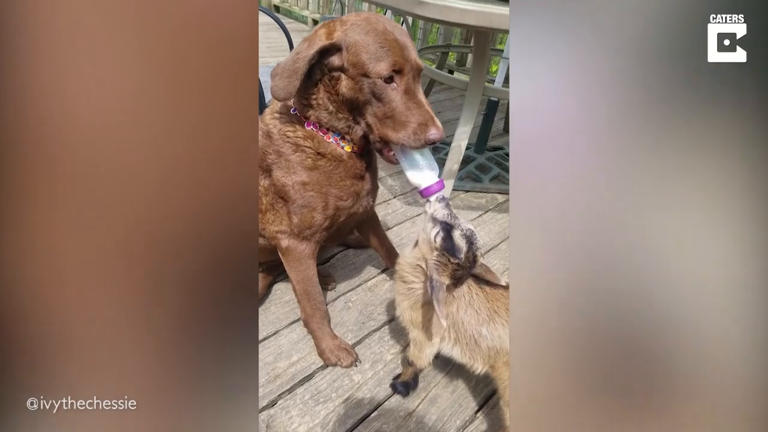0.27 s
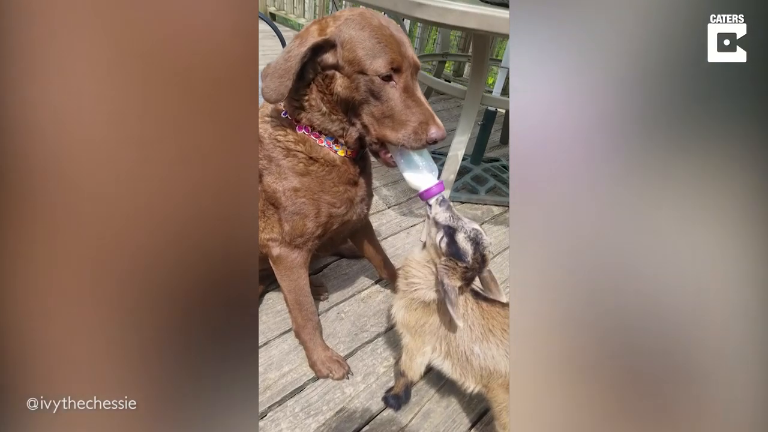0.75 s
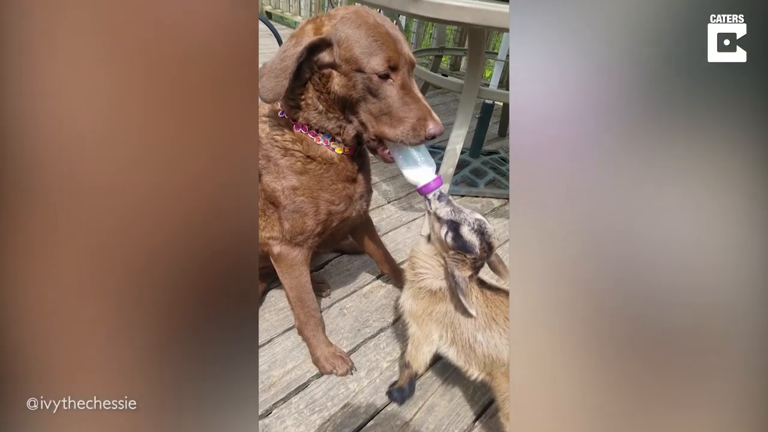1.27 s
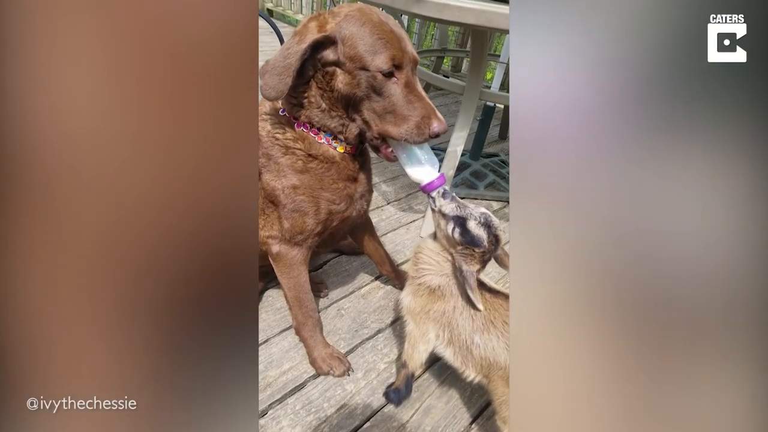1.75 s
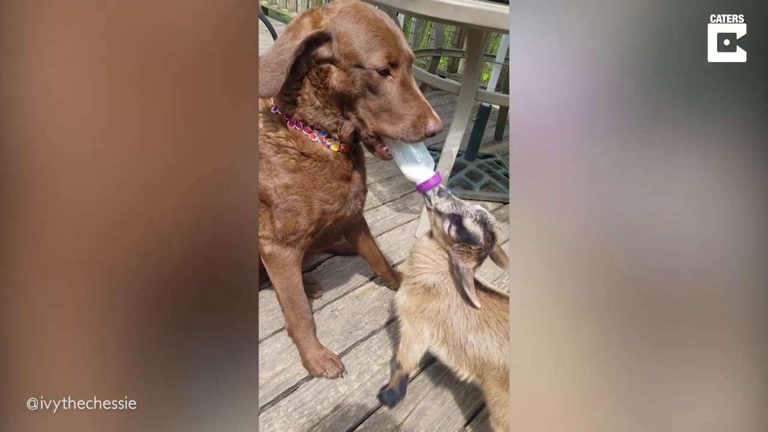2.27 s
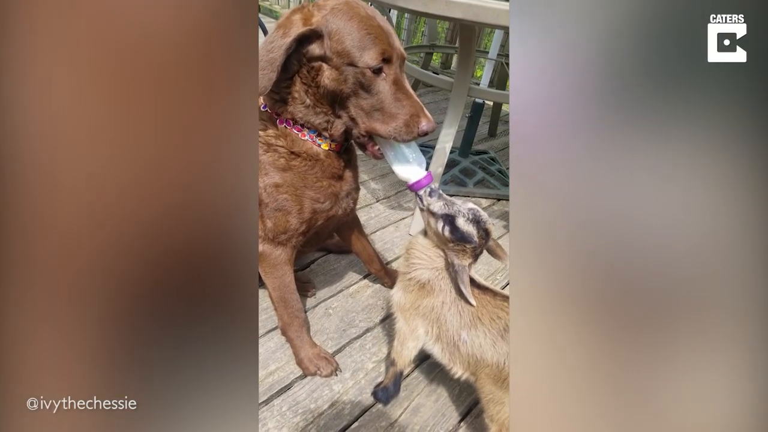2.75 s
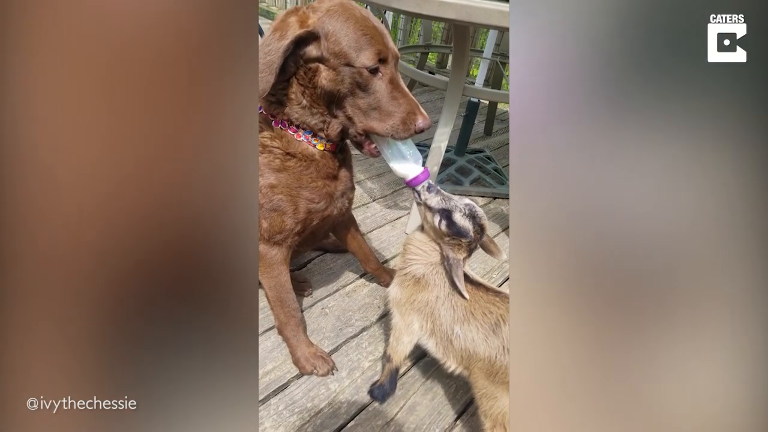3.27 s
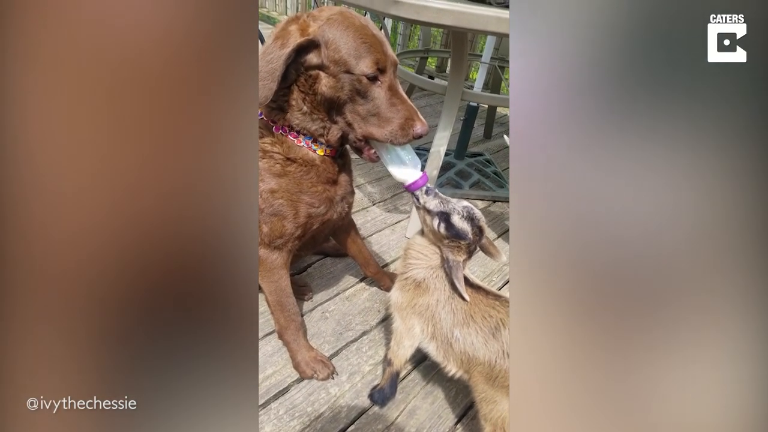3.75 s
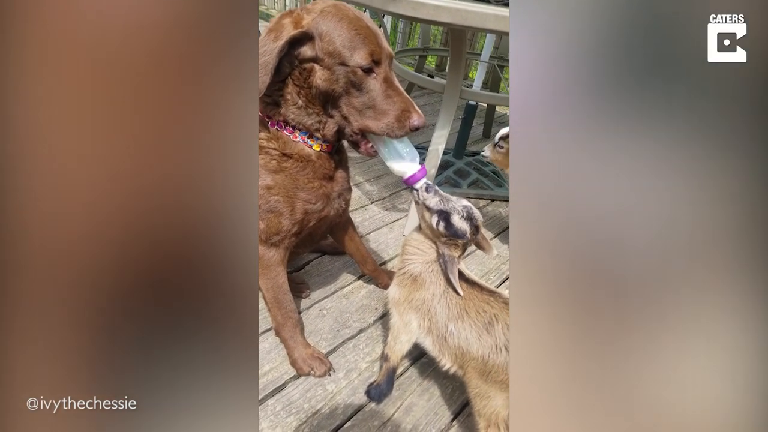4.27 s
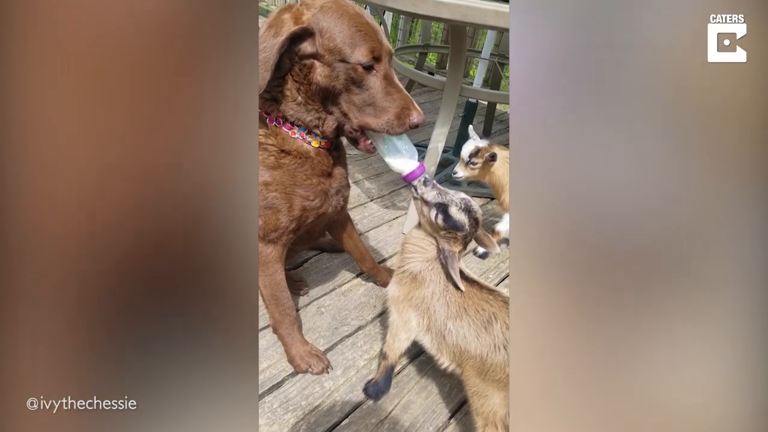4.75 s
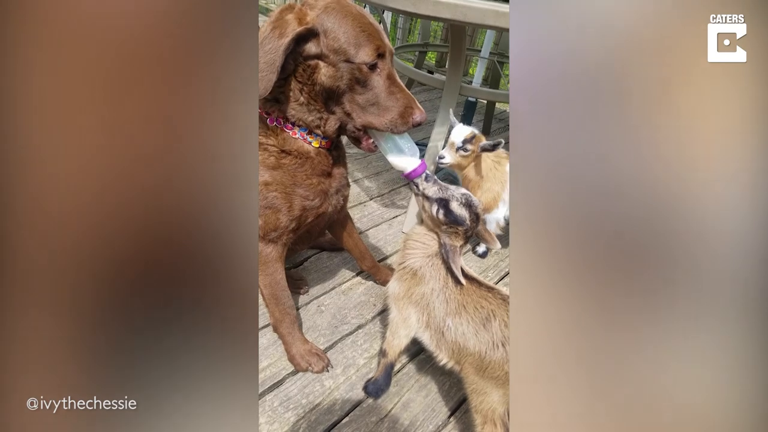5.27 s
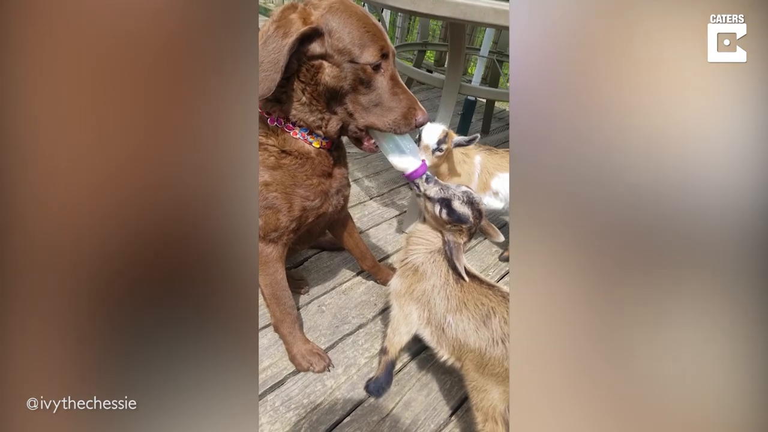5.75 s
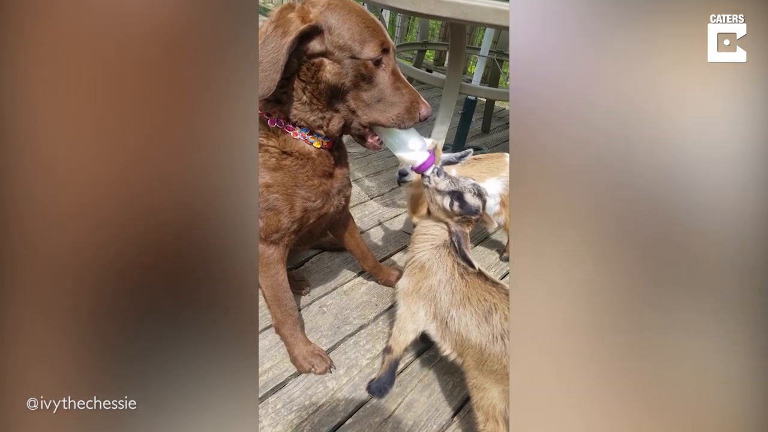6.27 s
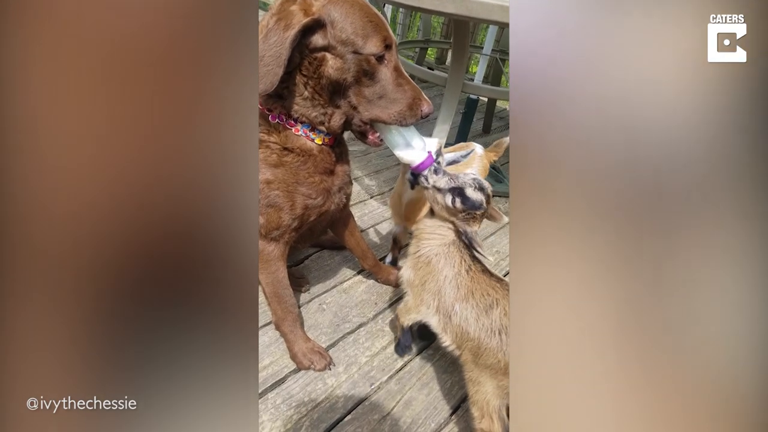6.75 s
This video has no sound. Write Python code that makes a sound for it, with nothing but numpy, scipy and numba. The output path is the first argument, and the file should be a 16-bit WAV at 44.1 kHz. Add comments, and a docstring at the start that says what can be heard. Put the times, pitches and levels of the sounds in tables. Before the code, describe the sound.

Close, soft suckling of a baby goat on a bottle: fizzy slurps, wet snaps and small swallows over faint outdoor rumble.

```python
"""A goat kid sucks at a milk bottle that a dog holds on a wooden deck, close to a phone.
In each suck the lips part and close again: tiny bursts of milk and air ring the gap, which mostly
falls in pitch as it opens and climbs as it shuts. Squelches, wet snaps, hollow plops, teat rubs,
soft shuffling, thin hisses and ticking foam fill in around the sucks, all scattered by the boards.
Puffs of wind hit the microphone over outdoor air and the hum of a distant machine."""
import sys
import numpy as np
from scipy import signal
from scipy.fft import rfft, irfft, next_fast_len
from scipy.io import wavfile
from numba import njit

SR = 44100
rng = np.random.default_rng(int(sys.argv[2]) if len(sys.argv) > 2 else 0)


def digitize_waveform(pressure):
    """Quantize a signal to 16-bit integers and store it at the path in sys.argv[1].

    Rows of a 2-D input are taken as channels; values are limited to [-1, 1].
    """
    field = np.atleast_2d(pressure).T
    bounded = np.clip(field, -1, 1)
    quanta = np.round(bounded * 32767).astype(np.int16)
    wavfile.write(sys.argv[1], SR, quanta)


N = 309141

# Cue levels are set ahead of each layer's trim and the deck.
# full sucks: t/s, parting length/s, closing length/s, parting level/dB, closing level/dB, widest gap f/Hz
SUCK_CUES = [(0.864, .057, 0.041, -66.5, -55, 6540), (1.084, .051, 0.034, -64, -50, 4600),
             (1.313, 0.061, 0.047, -64, -50, 4080), (3.282, 0.039, 0.065, -58.5, -55, 4640),
             (3.494, 0.051, 0.04, -56.5, -49.5, 3820), (3.749, 0.048, 0.043, -54, -43.5, 3820),
             (4.29, .045, 0.016, -59, -47.5, 3900), (4.542, 0.032, 0.049, -63.5, -53, 6360),
             (5.005, 0.07, 0.055, -66, -50.5, 6250), (5.759, .064, .02, -60, -48.5, 5570),
             (6.295, .092, 0.014, -65, -46, 6840)]
# squelches with the lips held still: t/s, length/s, level/dB, gap f/Hz
SQUELCH_CUES = [(0.375, 0.072, -51, 6840), (0.641, 0.046, -55.5, 5150), (0.712, .033, -62.5, 4350),
                (1.177, 0.056, -65.5, 6400), (1.428, 0.03, -64.5, 6300), (1.556, 0.059, -66.5, 6000),
                (1.634, 0.063, -62.5, 5760), (1.799, 0.036, -55.5, 4740), (1.891, 0.063, -66, 6160),
                (2.032, 0.047, -59.5, 5600), (2.128, 0.097, -65.5, 6460), (2.298, 0.036, -56, 6470),
                (2.365, 0.072, -55, 6280), (2.573, 0.028, -61, 6000), (2.851, 0.0083, -56.5, 6600),
                (3.061, 0.083, -57.5, 5250), (3.596, 0.041, -67.5, 6440), (4.781, 0.088, -63.5, 6070),
                (4.834, 0.029, -56, 6600), (4.878, 0.026, -58.5, 7240), (5.249, 0.03, -65.5, 6130),
                (5.325, 0.051, -57, 5800), (5.491, 0.038, -58.5, 5780), (5.581, 0.061, -52.5, 6250),
                (6.559, 0.072, -57.5, 6220), (6.802, 0.042, -58.5, 6260), (6.872, 0.052, -54, 7030)]
# a wet seal snaps open: t/s, peak level/dB, ring f/Hz
SNAP_CUES = [(0.289, -32.5, 12700), (.957, -35, 12000), (1.091, -31.5, 7550), (1.222, -33, 12300),
             (1.458, -35.5, 6700), (1.858, -27.5, 3360), (2.103, -41, 1700), (2.136, -44, 10500),
             (2.844, -30, 7500), (3.563, -27, 2700), (3.582, -36, 5940), (3.834, -21, 10900),
             (4.343, -28, 8500), (4.605, -36.5, 5570), (5.323, -28.5, 4270), (5.634, -33.5, 7000),
             (5.842, -26, 7600), (6.03, -43, 10600), (6.386, -21, 11800), (6.392, -11, 12600),
             (6.397, -17.5, 11500), (6.881, -26, 7300)]
# hollow plops of swallowed milk and air: t/s, main mode level/dB, f/Hz
PLOP_CUES = [(.664, -37.5, 733), (.671, -38, 688), (1.8595, -51, 577), (2.322, -55, 447), (2.344, -47, 382),
             (2.755, -51.5, 640), (2.785, -53, 348), (3.391, -45.5, 366), (3.561, -44.5, 597),
             (4.907, -42, 785), (5.027, -46.5, 347.5), (5.324, -48, 508), (5.505, -47.5, 560),
             (6.241, -50, 352), (6.689, -47, 579)]
# the teat rubs in the mouth: t/s, length/s, level/dB
RUB_CUES = [(0.381, 0.066, -56.5), (0.639, 0.059, -63), (1.639, 0.023, -61), (1.854, 0.028, -58),
            (2.297, 0.044, -65), (3.329, 0.062, -61.5), (3.586, 0.045, -59.5), (3.816, 0.036, -57.5),
            (4.299, .09, -64.5), (4.598, .05, -63.5), (4.783, 0.067, -65), (6.32, 0.12, -66.5),
            (6.571, 0.057, -64.5)]
# soft shuffling: t/s, length/s, level/dB, hollow f/Hz
SHUFFLE_CUES = [(1.703, 0.085, -67.5, 623), (2.567, 0.055, -68.5, 860), (2.747, 0.069, -68, 376),
                (2.961, 0.35, -78, 780), (3.337, .18, -61.5, 325), (3.605, 0.081, -64.5, 346),
                (4.913, .042, -60.5, 784), (4.994, 0.066, -64.5, 330), (5.128, 0.067, -67.5, 320),
                (5.482, 0.068, -68.5, 573), (5.984, 0.2, -71, 670), (6.232, 0.067, -59, 359),
                (6.306, .124, -71, 712), (6.494, 0.12, -65.5, 410), (6.58, 0.082, -60.5, 545),
                (6.701, .13, -70.5, 565)]
# thin faint hisses: t/s, length/s, level/dB, start f/Hz, end f/Hz
HISS_CUES = [(0.087, .275, -64.5, 3620, 2650), (0.741, 0.086, -72.5, 2777, 2581)]
# wind puffs: t/s, length/s, left level/dB, right level/dB
PUFF_CUES = [(0.0, 0.072, -34, -28.5), (0.082, 0.087, -30, -40), (.183, 0.062, -39.5, -55),
             (.253, 0.11, -43, -70), (1.221, .108, -63, -39.5), (1.903, 0.058, -51, -77),
             (2.165, 0.081, -53.5, -79), (4.181, 0.067, -42.5, -75), (5.162, .11, -47.5, -82),
             (5.279, .13, -42.5, -63)]
# bright fizz of a bursting film of milk: f/Hz, level/dB
FIZZ_EQ = [(3000, -38), (6000, -16), (9300, -14), (12000, -2), (14700, -0.5), (15600, 4)]
# midrange rasp of the mouth cavity: f/Hz, level/dB
RASP_EQ = [(400, -5), (1050, -10), (1600, -0.5), (2500, -0.5), (4000, -4.5), (8000, -47)]
# shading of the right microphone port: f/Hz, level/dB
RIGHT_PORT_EQ = [(100, -12.5), (600, -1), (1200, 0), (2400, -3.5), (4400, 2.5), (8000, 2.5), (14000, -4)]
# bed of outdoor air and microphone hiss: f/Hz, level/dB
AIR_EQ = [(18, -29), (32, -3), (52, -15.5), (75, 0.5), (125, -0.5), (175, -12), (350, -16), (750, -21.5),
          (1200, -29.5), (2300, -28.5), (3800, -31.5), (7500, -30), (9400, -41.5), (12000, -28),
          (15800, -34.5)]
# partials of the distant machine: f/Hz, level/dB
HUM_PARTIALS = [(55, -64.5), (70, -69.5), (111, -70.5), (118, -66.5)]
# tone of the lip gap, and of the shuffling: f/Hz, level/dB
GAP_EQ = [(1000, -33), (2800, 0), (4100, 4.5), (5400, -1.5), (7600, 7.5), (9200, -2), (16000, 9)]
SHUFFLE_EQ = [(100, 15.5), (220, 7.5), (850, -4.5), (1200, -6.5), (3000, -12)]


def sucks(parting_hz=6080, shut_hz=7580):
    """The lips part, tearing a fizzy film, and close at once; between sucks they squelch on the teat."""
    out = np.zeros(N)
    for s, parting_s, closing_s, parting_db, closing_db, widest_hz in SUCK_CUES:
        parting = slurp(parting_s, parting_db, parting_hz, widest_hz, peak_at=.3, bend=.85, tear_db=1)
        closing = slurp(closing_s, closing_db, widest_hz, shut_hz, peak_at=.61, bend=1.5)
        add(out, s, parting)
        add(out, s + parting_s, closing)
    for s, length, db, hz in SQUELCH_CUES:
        add(out, s, slurp(length, db, hz, hz, peak_at=.24))
    return out


def slurp(length, db, start_hz, end_hz, peak_at, bend=1, tear_db=0):
    """Milk and air crackle through the lip gap, whose resonance glides as it narrows or opens."""
    edge_db = np.interp(db, [-58, -47], [-7, -12])  # hard sucks swell to a sharper peak
    progress, env = swell(length, peak_at, edge_db, tail_s=.014)
    flow = env * crackle(len(env), rate=900, spread_db=4.5, air=.42)
    hz = start_hz * (end_hz / start_hz) ** (progress ** bend)  # bend under 1 glides early, over 1 late
    gap = colour(ring(flow, hz, width_hz=1400), GAP_EQ)
    bubbles = popping(env, .95 * hz, rate=560, scatter=.22, cycles=10, spread_db=-1.5)
    fizz_db = db + 7 + tear_db + 10 * np.log2(min(start_hz, end_hz) / 5000)  # a tight gap fizzes more
    rasp_db = -73.5 + .26 * (db + 56)  # the mouth rasp grows only a little with effort
    return (burst(gap, length, db + .03)
            + burst(bubbles, length, db - 5)
            + burst(colour(flow, FIZZ_EQ), length, fizz_db)
            + burst(colour(flow, RASP_EQ), length, rasp_db))


def snaps(decay_s=.00045, trim_db=-2):
    """A film breaks: one sharp pulse and a very short spatter ring a small cavity."""
    out, t = np.zeros(N), np.arange(SR // 50) / SR
    for s, db, hz in SNAP_CUES:
        spatter = .62 * rng.standard_normal(len(t)) * np.exp(-t / decay_s)
        spatter[0] += 1  # the pulse
        click = ring(spatter, hz, width_hz=.35 * hz)
        add(out, s, click * undb(db + trim_db) / np.abs(click).max())
    return out


def plops(trim_db=-2.9, decay_cycles=7, attack_s=.00017, stagger_s=.00173):
    """A swallow rings a cavity briefly, with weaker modes on either side; higher modes die sooner."""
    out = np.zeros(N)
    for s, db, hz in PLOP_CUES:
        for ratio, mode_db in ((1, 0), (.73, -8), (1.226, -8), (4, -12)):
            mode_hz = hz * ratio
            detune = 1 + .016 * rng.standard_normal()
            tone = bubble(mode_hz * detune, decay_cycles / mode_hz, rise=.1)
            attack = 1 - np.exp(-np.arange(len(tone)) / SR / attack_s)
            add(out, s + stagger_s * rng.random(), tone * attack * undb(db + trim_db + mode_db))
    return out


def teat_rubs():
    """Rubber drags over the tongue and rasps in the mouth cavity."""
    out = np.zeros(N)
    for s, length, db in RUB_CUES:
        add(out, s, burst(colour(stick_slip(length), RASP_EQ), length, db))
    return out


def shuffles(trim_db=4, body_hz=640, rasp_db=-74):
    """Soft uneven pushes ring a hollow and a fixed body resonance, with a faint rasp on top."""
    out = np.zeros(N)
    for s, length, db, hz in SHUFFLE_CUES:
        push = stick_slip(length)
        hollow = level(ring(push, hz, width_hz=160), 0)
        body = level(ring(push, body_hz, width_hz=330), -5)
        add(out, s, burst(colour(hollow + body, SHUFFLE_EQ), length, db + trim_db))
        add(out, s, burst(colour(push, RASP_EQ), length, rasp_db))
    return out


def hisses(width_hz=1500):
    """A narrow band of noise swells and sinks in pitch."""
    out = np.zeros(N)
    for s, length, db, start_hz, end_hz in HISS_CUES:
        progress, env = swell(length, peak_at=.84, edge_db=-11.5, tail_s=.011)
        hz = start_hz + (end_hz - start_hz) * progress
        band = ring(env * rng.standard_normal(len(env)), hz, width_hz)
        add(out, s, burst(ring(band, hz, width_hz), length, db))
    return out


def froth(tick_db=-68, ping_db=-75, ping_hz=6800., settle_s=.028):
    """Milk foam on the lips keeps ticking and pinging faintly, most just after a suck or squelch."""
    ends = [s + parting_s + closing_s for s, parting_s, closing_s, *_ in SUCK_CUES]
    ends += [s + length for s, length, *_ in SQUELCH_CUES]
    fresh_foam = np.zeros(N)
    for s in ends:
        add(fresh_foam, s, np.exp(-np.arange(SR // 2) / SR / settle_s))
    wetness = .59 + np.minimum(fresh_foam, 1)
    ticks = crackle(N, rate=310, spread_db=6, air=.18) * wetness
    pings = popping(wetness, np.full(N, ping_hz), rate=70, scatter=.12, cycles=12, spread_db=1)
    return level(colour(ticks, FIZZ_EQ), tick_db) + level(pings, ping_db)


def deck(x, right_lag_s=.00008, right_direct_db=-9, trim_db=1.08):
    """Boards and furniture scatter the sound as the head moves; the right port is later and weaker."""
    t = np.arange(SR // 5) / SR
    ports = []
    for lag_s, direct_db in ((0, 0), (right_lag_s, right_direct_db)):
        delay = np.sinc((t[:24] - lag_s) * SR - 8)
        sound = undb(direct_db) * signal.fftconvolve(x, delay)[8:N + 8]
        head_turn = 2 * drift(4)
        for weight in (np.cos(head_turn), np.sin(head_turn)):  # crossfade two sets of reflections
            near = burst(rng.standard_normal(len(t)) * np.exp(-t / .0054), 1 / SR, db=-7)
            far = burst(rng.standard_normal(len(t)) * np.exp(-t / .014), 1 / SR, db=-12)
            add(sound, .0003, signal.fftconvolve(x * weight, near + far))
        ports.append(sound * undb(trim_db))
    left, right = ports
    return np.array([left, colour(right, RIGHT_PORT_EQ)])


def wind(usual_db=-40, usual_edge_hz=90.5, db_per_octave=16, attack_s=.0054):
    """Eddies push on each microphone port separately; stronger puffs are brighter."""
    out = np.zeros((2, N))
    for s, length, left_db, right_db in PUFF_CUES:
        _, env = swell(length, peak_at=.49, edge_db=1, tail_s=.0032)  # nearly flat
        env *= np.minimum(np.arange(len(env)) / SR / attack_s, 1)
        octaves_up = (max(left_db, right_db) - usual_db) / db_per_octave
        edge_hz = max(usual_edge_hz * 2 ** octaves_up, 62)
        eq = [(25, -19), (50, 0), (edge_hz, -3), (2 * edge_hz, -26), (4 * edge_hz, -47), (4000, -80)]
        for port, db in zip(out, (left_db, right_db)):
            eddies = colour(rng.standard_normal(SR), eq)[:len(env)]
            add(port, s, burst(env * eddies, length, db))
    return out


def outdoor_air(db=-59.5):
    """A bed of air and microphone hiss, partly shared by both ports, slowly rises and falls."""
    common, own = rng.standard_normal(N), rng.standard_normal((2, N))
    bed = colour(.57 * common + own, AIR_EQ)
    return level(bed * undb(3.6 * drift(2.243)), db)


def machine_hum():
    """A distant machine hums on low partials, each wavering in level and phase."""
    out, t = np.zeros(N), np.arange(N) / SR
    for hz, db in HUM_PARTIALS:
        gain = undb(db + 2 * drift(2.33)) * np.sqrt(2)
        out += gain * np.sin(2 * np.pi * hz * t + .5 * drift(2.5))
    return out


def popping(env, hz, rate, scatter, cycles, spread_db):
    """Bubbles of uneven size burst under an envelope, each on its own pitch near hz."""
    out = np.zeros(N)
    for i in np.flatnonzero(rng.random(len(env)) < rate / SR):
        pitch = min(hz[i] * np.exp(scatter * rng.standard_normal()), SR / 3)
        gain = env[i] * undb(spread_db * min(rng.exponential(), 2))
        add(out, i / SR, gain * bubble(pitch, cycles / pitch, rise=.12))
    return out[:len(env)]


def bubble(hz, decay_s, rise):
    """A pocket of air rings and climbs in pitch as it dies."""
    t = np.arange(int(6 * decay_s * SR) + 2) / SR
    return np.sin(2 * np.pi * hz * t * (1 + rise * t / t[-1] / 2)) * np.exp(-t / decay_s)


def stick_slip(length):
    """Soft, grainy friction that swells and fades."""
    _, env = swell(length, peak_at=.26, edge_db=-5.5, tail_s=.02)
    return env * crackle(len(env), rate=260, spread_db=2.5, air=.74)


def crackle(size, rate, spread_db, air):
    """Tiny bursts of uneven strength, about rate a second, over a little streaming air."""
    strength = undb(spread_db * np.minimum(rng.exponential(size=size), 3))
    bursts = (rng.random(size) < rate / SR) * strength * rng.choice([-1, 1], size)
    return level(bursts, 0) + air * rng.standard_normal(size)


def swell(length, peak_at, edge_db, tail_s):
    """Pressure builds until progress peak_at, eases and dies away; returns progress 0-1 and envelope."""
    t = np.arange(int((length + 5 * tail_s) * SR)) / SR
    progress = np.minimum(t / length, 1)
    env = undb(np.interp(progress, [0, peak_at, 1], [edge_db, 0, edge_db]))
    env *= np.minimum(t / .005, 1) * np.exp(-np.maximum(t - length, 0) / tail_s)
    return progress, env / np.sqrt(np.sum(env ** 2) / (length * SR))


def drift(rate):
    """Slow random modulation with a spread near 1 and rate new targets a second."""
    knots = rng.standard_normal(int(N / SR * rate) + 2)
    return np.interp(np.arange(N) / SR * rate, np.arange(len(knots)), knots)


def ring(x, hz, width_hz):
    """A resonance, fixed or gliding."""
    return bandpass(x, np.clip(hz + np.zeros(len(x)), 20, .45 * SR), float(width_hz))


@njit
def bandpass(x, hz, width_hz):
    """State-variable filter with a moving centre."""
    y, band_state, low_state = np.empty(len(x)), 0., 0.
    for i in range(len(x)):
        tuning, damping = np.tan(np.pi * hz[i] / SR), width_hz / hz[i]
        band = (band_state + tuning * (x[i] - low_state)) / (1 + tuning * (tuning + damping))
        band_state = 2 * band - band_state
        low_state += 2 * tuning * band
        y[i] = damping * band
    return y


def colour(x, eq):
    """Equalise along a curve of points: f/Hz, level/dB."""
    hz, db = np.transpose(eq)
    size = next_fast_len(x.shape[-1] + 512)
    f = np.maximum(np.fft.rfftfreq(size, 1 / SR), 1)
    gain = undb(np.interp(np.log(f), np.log(hz), db))
    return irfft(rfft(x, size) * gain, size)[..., :x.shape[-1]]


def undb(db):
    """Decibels to gain."""
    return 10 ** (np.asarray(db) / 20)


def level(x, db):
    """Scale to an rms level."""
    return x * undb(db) / np.sqrt(np.mean(x ** 2) + 1e-20)


def burst(x, length, db):
    """Scale x to the energy of db held for length seconds."""
    return level(x, db) * np.sqrt(length * SR / len(x))


def add(out, s, x):
    """Mix x into out from time s on."""
    i = max(int(s * SR), 0)
    out[..., i:i + x.shape[-1]] += x[..., :max(N - i, 0)]


def scene():
    """The kid up close on the deck, with wind and a left-leaning bed of air and hum around it."""
    close_up = sucks() + snaps() + plops() + teat_rubs() + shuffles() + hisses() + froth()
    bed_pan = undb([[0], [-7]])
    return deck(close_up) + wind() + (outdoor_air() + machine_hum()) * bed_pan


def record(dry, low_cut_hz=28, high_cut_hz=15850):
    """The phone cuts the deepest rumble and the very top."""
    low_cut = signal.butter(2, low_cut_hz, "high", fs=SR, output="sos")
    high_cut = signal.ellip(10, .2, 80, high_cut_hz, fs=SR, output="sos")
    return signal.sosfilt(high_cut, signal.sosfilt(low_cut, dry))


dry = scene()
out = record(dry)
digitize_waveform(out)
```